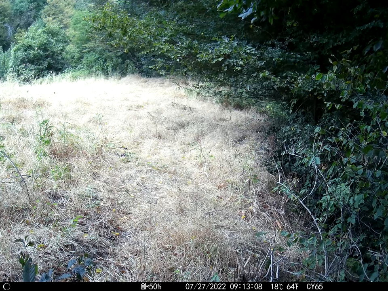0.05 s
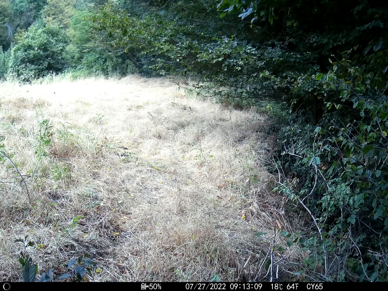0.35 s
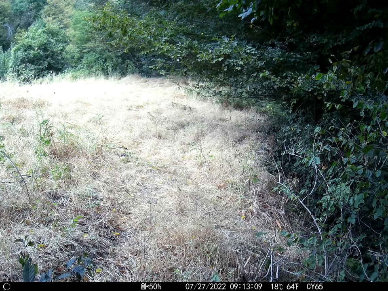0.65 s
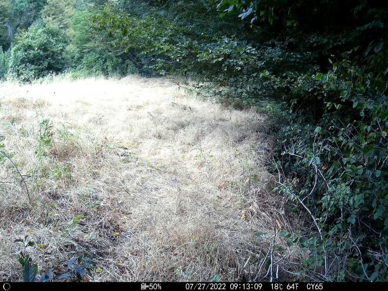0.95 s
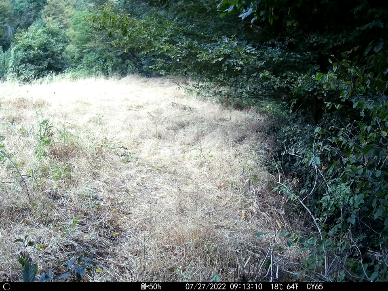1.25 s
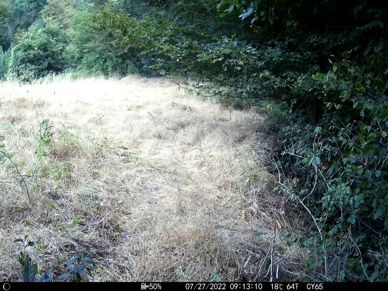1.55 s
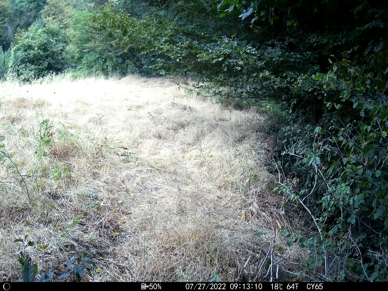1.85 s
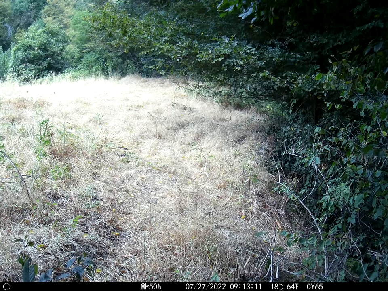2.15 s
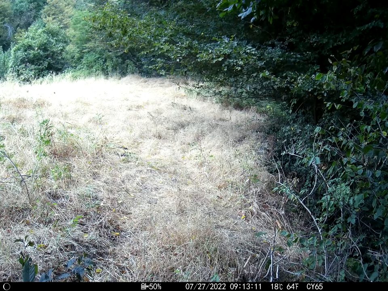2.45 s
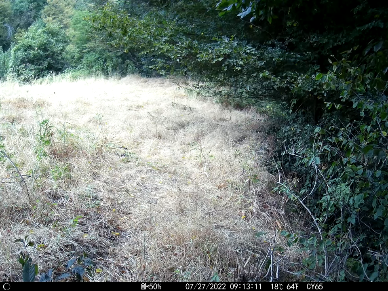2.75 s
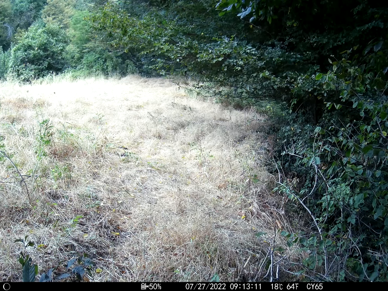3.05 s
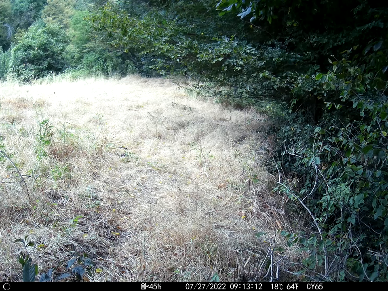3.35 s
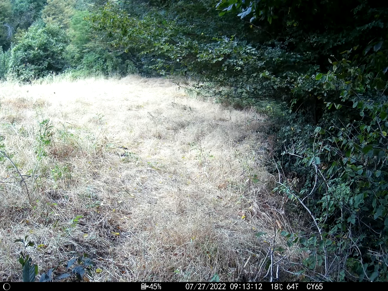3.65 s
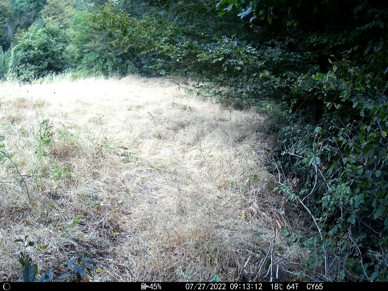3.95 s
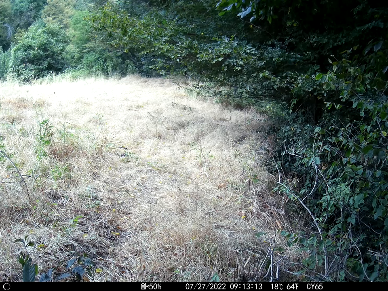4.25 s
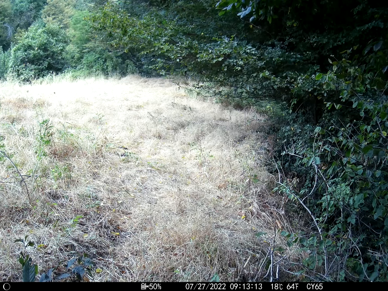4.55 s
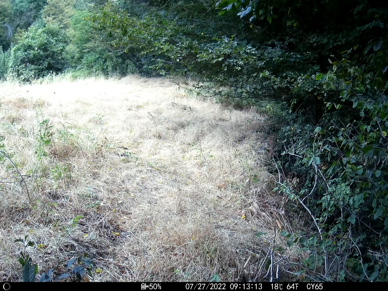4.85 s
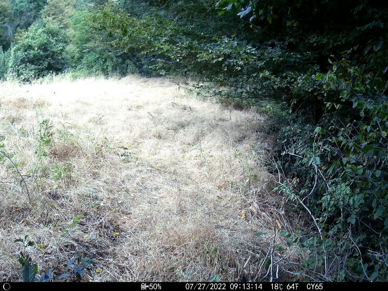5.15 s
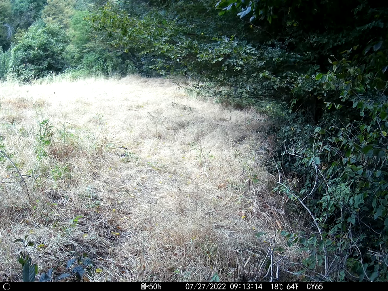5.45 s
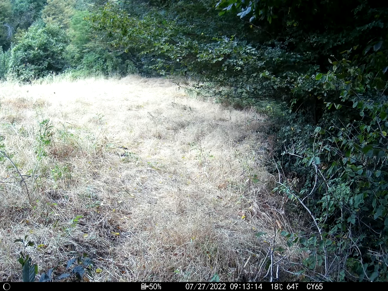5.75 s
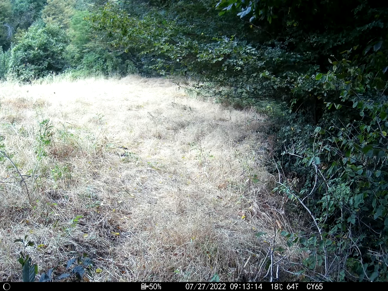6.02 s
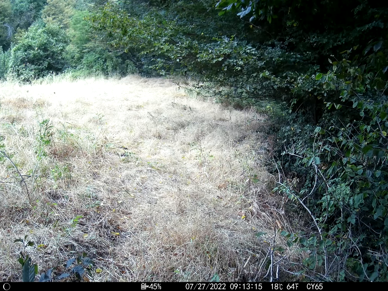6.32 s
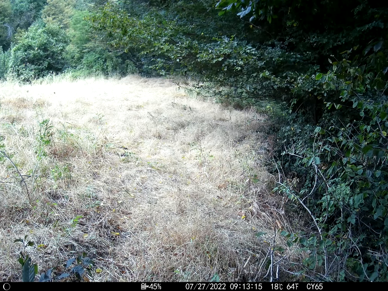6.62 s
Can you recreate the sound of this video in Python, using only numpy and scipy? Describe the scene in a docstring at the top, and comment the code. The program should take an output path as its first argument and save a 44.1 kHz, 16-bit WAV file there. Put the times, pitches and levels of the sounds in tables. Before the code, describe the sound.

At the wooded edge of a meadow, a fox gives four short, harsh barks close to the microphone, separated by pauses of a second or two. Each starts raspy and clears into a cry that drops in pitch, with a brief echo from the bushes and trees. A few faint, far-off bird whistles come before the first bark. A quiet rumble, hiss and thin electronic whine continue throughout.

```python
"""First comes a faint rumble with a trail camera's hiss and thin whine, and a small bird whistling far off.
Then a red fox barks four times across a dry meadow at the edge of a wood.
Its vocal folds shake unevenly and ring through throat and mouth, so each bark starts as a hoarse, rising
rasp before it clears into a falling cry. Bushes and trees scatter the sound back."""
import sys
import numpy as np
from scipy import signal
from scipy.fft import rfft, irfft, next_fast_len
from scipy.io import wavfile
from scipy.ndimage import uniform_filter1d

SR = 44100
rng = np.random.default_rng(int(sys.argv[2]) if len(sys.argv) > 2 else 0)


def transcribe(u):
    """Save the signal u as a 16-bit wav file named by the first command-line argument.

    u: samples, shape (n,) or (channels, n), limited to [-1, 1]; the rate is SR.
    q: integer samples, one column per channel.
    """
    v = np.clip(np.atleast_2d(u).T, -1, 1)
    q = np.round(v * 32767).astype(np.int16)
    wavfile.write(sys.argv[1], SR, q)


N = 298998

# The background's rumble and hiss. Each row: frequency in Hz, relative level in dB.
NOISE_SHAPE = [(12, -42), (20, -0.5), (98, -0.5), (352, -9.5), (382, -10.5), (549, -13.5), (597, -15),
               (667, -15), (1450, -17.5), (2090, -19), (8640, -18), (9660, -17.5), (10500, -18.5),
               (14300, -19.5), (15500, -22)]
# The camera's electronic whine. Each row: multiple of WHINE_HZ, level in dB.
WHINE_TONES = [(3, -84.5), (4, -85.5), (6, -77), (7, -80), (8, -92.5), (9, -90.5)]
# The bird. Each row: start and length in seconds, first and last pitch in Hz, relative level in dB.
WHISTLES = [(0.082, 0.1, 3330, 3470, -66), (.21, 0.052, 3150, 2690, -69.5), (.37, 0.069, 3850, 3610, -75),
            (0.408, 0.059, 2700, 2880, -69), (0.46, 0.11, 2950, 3040, -65.5)]
# How long the wood rings. Each row: frequency in Hz, seconds to fade by 60 dB.
WOOD_RING = [(500, 1), (1100, 1), (1550, 0.78), (2000, 0.48), (4000, 0.3), (10000, .45)]
# Echoes from the nearest trees. Each row: delay in seconds, relative level in dB.
ECHOES = [(0.106, -24.5), (0.176, -29.5), (0.311, -44)]
# Throat and mouth resonances (the frequencies they boost), one list for each bark.
# Each row: frequency in Hz, width in Hz, relative level in dB.
THROAT_RESONANCES = [
    [(650, 270, -30.5), (1068, 256, -4.5), (1370, 95, -2.5), (1651, 240, 1), (2400, 260, -21.5)],
    [(750, 280, -26), (1142, 200, -2), (1400, 204, -4), (1745, 310, -3), (2300, 355, -14.5)],
    [(750, 230, -27), (1068, 240, -1.5), (1396, 370, -10), (1712, 290, 3), (2300, 330, -14)],
    [(605, 270, -16), (1140, 350, -3.5), (1606, 220, -6), (1830, 340, 2), (2320, 400, -19.5)],
]
# High resonances that give a bark its sharp edge. Each row: frequency and width in Hz, relative dB.
EDGE_RESONANCES = [(3060, 600, -4), (3580, 620, 0), (4290, 730, 1.5), (4770, 280, 2), (5242, 340, 3),
                   (5830, 220, -2), (6400, 430, -20), (9000, 6600, -31.5)]
# The resonance that lifts the cry's nearest overtones. Its row: frequency and width in Hz, relative dB.
MOUTH_RESONANCE = [(2300, 320, -23)]
# Tiny yelps. Each row: time of the peak and half-width in seconds, pitch in Hz, level in dB.
YELP_NOTES = [(2.700, 0.0042, 1688, -16.5), (4.702, 0.006, 1660, -17)]
# The barks. Each row: start and length in seconds, relative level in dB; swell time, hold time and time
# until the voice breaks, in seconds; first, top and target pitch in Hz, fall time in seconds;
# roughness of the rasp (0-1), the cry's share of the power (0-1); edge level in dB against the bark,
# edge tilt in dB an octave, share of the edge that the cry's overtones take (0-1).
FOX_BARKS = [(1.287, .39, -22.5, 0.1, 0.12, .16, 515, 807.4, 360, .36, .27, 0.85, -22.5, 8.5, .2),
             (2.561, 0.3, -22.5, 0.069, 0.066, 0.14, 636.6, 769, 568, .16, .26, .72, -14.5, 7, .3),
             (4.528, .395, -18, 0.075, 0.14, 0.17, 599.4, 798.3, 497, .28, .4, 0.87, -7.5, 3.5, .65),
             (5.905, .2, -26, 0.046, 0.068, .06, 525.5, 661.7, 544.7, .08, .48, 0.95, -14, 15, .15)]

NOISE_DB, WHINE_HZ, CUTOFF_HZ = -63.5, 1562.5, 15400
LEAD_IN_S, ONSET_S, CLOSE_S = .04, 0.0055, 0.065   # room before a bark, its rounded start, its closing
CLEAR_S, CRY_ROUGH = 0.066, .33   # how quickly the rasp clears; the cry's roughness (0-1)
EDGE_SWELL_POWER, EDGE_FADE_DB = 1.6, 24   # the edge swells later than the voice
CHEST_DB, CHEST_ATTACK_S, CHEST_FADE_DB = -27, .015, 28.5   # the lowest tone starts fast, fades sooner
PUFF_DB, PUFF_DELAY_S = -40.5, .011   # the soft opening puff, against the bark's level and start
BREAK_JUMP, JUMP_S = .1, .025   # as the voice breaks its pitch jumps up by this share
BREAK_DIP_DB, BREAK_DIP_S = -2.5, 0.0042   # the voice catches as it breaks
SAG_DB, SAG_S, FADE_DB = 8, .035, 6   # after the hold the force sags quickly and fades to the end


def from_db(db):
    """Turn decibels into a number to multiply by."""
    return 10 ** (np.asarray(db) / 20)


def rms_one(x):
    """Scale a sound so its average power is one."""
    return x / np.sqrt(np.mean(x ** 2) + 1e-20)


def evened(x, size=900):
    """Even out slow changes in loudness, leaving the fast flutter."""
    return x / np.sqrt(np.abs(uniform_filter1d(x ** 2, size)) + 1e-12)


def blend(first, second, share):
    """Mix two sounds while keeping the power steady."""
    return evened(np.sqrt(1 - share) * evened(first) + np.sqrt(share) * evened(second))


def ramp(age, begin, span):
    """Go from 0 to 1 in a straight line."""
    return np.clip((age - begin) / max(span, 1 / SR), 0, 1)


def at_hz(points, hz):
    """Read between a table's rows, with octaves evenly spaced."""
    f, value = np.transpose(points)
    return np.interp(np.log(np.maximum(hz, 1)), np.log(f), value)


def wander(rate_hz, size):
    """A smooth random wobble, typically about one in size."""
    low = signal.butter(2, min(rate_hz, SR / 4), fs=SR, output="sos")
    return rms_one(signal.sosfilt(low, rng.standard_normal(2 * size))[size:])


def band_noise(low_hz, high_hz, size):
    """Noise lying mostly between two frequencies."""
    band = signal.butter(2, [low_hz, high_hz], "band", fs=SR, output="sos")
    return signal.sosfilt(band, rng.standard_normal(size))


def background():
    """Steady low rumble and microphone hiss, with the camera's thin whine."""
    colour = from_db(at_hz(NOISE_SHAPE, np.arange(N // 2 + 1) * SR / N))
    noise = from_db(NOISE_DB) * rms_one(irfft(rfft(rng.standard_normal(N)) * colour, N))
    phase = 2 * np.pi * WHINE_HZ * np.arange(N) / SR
    return noise + sum(from_db(db) * np.sqrt(2) * np.sin(round(k) * phase) for k, db in WHINE_TONES)


def meadow(x, near_db=-7.5, near_ring_s=.34, wood_db=-27.0, wood_delay_s=0.059,
           wood_dull_hz=5200, echo_dull_hz=2500):
    """Add quick scatter from bushes, echoes from single trees and a later, duller wash from the wood."""
    t = np.arange(SR) / SR
    near = rng.standard_normal(SR) * from_db(-60 * t / near_ring_s) * (1 - np.exp(-t / 0.006))
    edges, wood = np.geomspace(350, 11200, 11), 0
    for low, high in zip(edges, edges[1:]):
        hz = np.sqrt(low * high)
        decay = from_db(-60 * t / at_hz(WOOD_RING, hz)) * (1 - np.exp(-t / 0.0099))
        dulling = np.hypot(1, (hz / wood_dull_hz) ** 2)
        wood = wood + band_noise(low, high, SR) * decay / np.linalg.norm(decay) / dulling
    wood = np.interp(t - wood_delay_s, t, wood, left=0)
    scatter = from_db(near_db) * near / np.linalg.norm(near) + from_db(wood_db) * wood
    now = np.arange(N) / SR
    echoes = sum(from_db(db) * np.interp(now - delay, now, x, left=0) for delay, db in ECHOES)
    echoes = signal.sosfilt(signal.butter(2, echo_dull_hz, fs=SR, output="sos"), echoes)
    return x + signal.fftconvolve(x, scatter)[:N] + echoes


def bird(waver=0.014):
    """Thin whistles that slide and waver in pitch."""
    out = np.zeros(N)
    for s, length, first_hz, last_hz, db in WHISTLES:
        size, start = int(length * SR), int(s * SR)
        hz = np.linspace(first_hz, last_hz, size) * (1 + waver * wander(130, size))
        tone = np.sqrt(2) * np.sin(2 * np.pi * np.cumsum(hz) / SR)
        out[start:start + size] += from_db(db) * np.hanning(size) * tone
    return out


def envelope(age, length, attack, fade_from, fade_db, power=1):
    """Loudness over time: swell from a rounded start, hold, fade, then close."""
    swell = np.minimum(ONSET_S * np.logaddexp(0, age / ONSET_S) / attack, 1) ** power
    fade = from_db(-fade_db * ramp(age, fade_from, length - fade_from))
    return swell * fade * (1 - ramp(age, length - CLOSE_S, CLOSE_S))


def low_noise(noise_db=-55.5, follow=0.32, puff_s=0.045):
    """Faint low noise swells with each bark; separately, a soft low puff opens each bark."""
    t = np.arange(N) / SR
    loudness = sum(from_db(db) * envelope(t - s, length, attack, attack + hold, SAG_DB + FADE_DB)
                   for s, length, db, attack, hold, *_ in FOX_BARKS)
    noise = from_db(noise_db) * loudness ** follow * rms_one(band_noise(55, 430, N))
    puffs = sum(from_db(db + PUFF_DB) * np.exp(-np.minimum(((t - s - PUFF_DELAY_S) / puff_s) ** 2, 50))
                for s, _, db, *_ in FOX_BARKS)
    return noise + puffs * rms_one(band_noise(160, 250, N))


def yelps():
    """For a few cycles the voice locks onto the upper mouth resonance."""
    t = np.arange(N) / SR
    out = np.zeros(N)
    for peak_s, half_width, hz, db in YELP_NOTES:
        swell = np.exp(-np.minimum(((t - peak_s) / half_width) ** 2, 50))
        out += from_db(db) * np.sqrt(2) * swell * np.sin(2 * np.pi * hz * (t - peak_s))
    return out


def over_ground(x, lag_s=0.002035, bounce=0.14):
    """A bounce off the field arrives upside down and thins the sound about every 500 Hz."""
    t = np.arange(len(x)) / SR
    return x - bounce * np.interp(t - lag_s, t, x, left=0)


def resonate(x, resonances):
    """Let a sound ring through resonances, each passing a narrow range of frequencies."""
    size = next_fast_len(2 * len(x))
    hz = np.arange(size // 2 + 1) * SR / size + 1
    power = sum(from_db(2 * db) / (1 + ((hz * hz - f * f) / (hz * width)) ** 2) ** 2
                for f, width, db in resonances)
    # Build the filter so that it rings only after the sound arrives.
    cepstrum = irfft(np.log(power + 1e-12), size)
    cepstrum[0] /= 2
    cepstrum[size // 2:] = 0
    return irfft(rfft(x, size) * np.exp(rfft(cepstrum)), size)[:len(x)]


def pitch_arch(age, breaks, first_hz, top_hz, end_hz, fall_s, climb_power=2.1, fall_power=1.25):
    """The pitch climbs and levels off, jumps as the voice breaks, then sinks smoothly."""
    rasp_hz = top_hz / (1 + BREAK_JUMP)
    climb = (rasp_hz - first_hz) * (1 - (1 - ramp(age, 0, breaks)) ** climb_power)
    jump = (top_hz - rasp_hz) * ramp(age, breaks - JUMP_S / 2, JUMP_S)
    fall = (top_hz - end_hz) * (1 - np.cos(np.pi * ramp(age, breaks, fall_s) ** fall_power)) / 2
    return first_hz + climb + jump - fall


def fold_phase(pitch, rough, jitter=.03, tremor=0.0091):
    """Follow the vocal folds' cycle, which trembles, and jitters more as the voice roughens."""
    size = len(pitch)
    hz = pitch * (1 + jitter * rough * wander(220, size) + tremor * wander(70, size))
    return 2 * np.pi * np.cumsum(hz) / SR


def chest(phase, rough):
    """The lowest tone and a weaker one at 1.5 times its pitch, shaken by the roughness."""
    shaken = phase + rough * wander(90, len(phase))
    return rms_one(np.sin(shaken) + .5 * np.sin(3 * shaken / 2))


def vocal_folds(phase, rough, between_db=-2.5, rasp=1.5, slope_db=-2.5, waver_db=3.5,
                smear=0.99, pulsing=0.57, count=24):
    """Strong and weak cycles put tones at every half multiple of the pitch; rough air adds noise."""
    size, tones = len(phase), 0
    for k in range(2, count + 1):
        strength_db = slope_db * np.log2(k / 2) + between_db * (k % 2) + waver_db * wander(16, size)
        shake = smear * np.sqrt(rough) * wander(70, size)
        tones = tones + from_db(strength_db) * np.cos(k / 2 * phase + shake)
    rushing_air = rng.standard_normal(size) * (1 + pulsing * np.cos(phase))
    return (1 - rough) * rms_one(tones) + rasp * rough * rushing_air


def cry_overtones(phase, waver_db=4.0, smear=.45, count=9):
    """The higher tones above the cry come and go."""
    size = len(phase)
    return sum(from_db(waver_db * wander(30, size)) * np.sin(k * phase + smear * wander(94, size))
               for k in range(3, count + 1))


def bark(row, throat, flutter_db=3.0, clear_lead_s=.008, edge_lead_s=0.0082):
    """A fluttering rasp through throat and mouth breaks into a cry at twice the folds' pitch."""
    (start, length, level_db, attack, hold, breaks, first_hz, top_hz, end_hz, fall_s,
     rasp_rough, cry_share, edge_db, tilt_db, overtone_share) = row
    age = np.arange(int((LEAD_IN_S + length) * SR)) / SR - LEAD_IN_S
    cleared = ramp(age, breaks - clear_lead_s, CLEAR_S)
    rough = np.clip(rasp_rough + (CRY_ROUGH - rasp_rough) * cleared, 0, 1)
    cry_mix = np.clip(cry_share * cleared, 0, 1)
    phase = fold_phase(pitch_arch(age, breaks, first_hz, top_hz, end_hz, fall_s), rough)
    rasp = over_ground(vocal_folds(phase, rough))
    overtones = cry_overtones(phase)
    cry = np.sin(2 * phase) + resonate(overtones, MOUTH_RESONANCE)

    body = blend(resonate(rasp, throat), cry, cry_mix)
    catch_db = BREAK_DIP_DB * np.exp(-((age - breaks) / BREAK_DIP_S) ** 2)
    sag_db = SAG_DB * ramp(age, attack + hold, SAG_S)
    body *= from_db(flutter_db * rough * wander(120, len(age)) + catch_db - sag_db)
    body *= envelope(age, length, attack, attack + hold, FADE_DB)

    tilted = [(hz, width, db + tilt_db * np.log2(min(hz, 6500) / 4500))
              for hz, width, db in EDGE_RESONANCES]
    edge = blend(resonate(rasp, tilted), resonate(overtones, tilted), overtone_share * cry_mix)
    edge *= envelope(age, length, attack, breaks - edge_lead_s, EDGE_FADE_DB, EDGE_SWELL_POWER)

    low = chest(phase, rough) * envelope(age, length, CHEST_ATTACK_S, breaks, CHEST_FADE_DB)
    voice = body + from_db(edge_db) * edge + from_db(CHEST_DB) * low
    return np.pad(from_db(level_db) * voice, (int((start - LEAD_IN_S) * SR), N))[:N]


def fox(voice_db=-1.83, low_cut_hz=505):
    """All barks and yelps; the small muzzle sends out little below the lowest pitch."""
    barks = sum(bark(row, throat) for row, throat in zip(FOX_BARKS, THROAT_RESONANCES))
    muzzle = signal.butter(8, low_cut_hz, "high", fs=SR, output="sos")
    return signal.sosfilt(muzzle, from_db(voice_db) * barks + yelps())


def scene():
    """The fox is near; the bird is deep in the trees, so more of its sound is scattered."""
    far_bird = from_db(-1.5) * meadow(bird(), near_db=-1.0, wood_db=-12.0)
    return (meadow(fox() + low_noise()) + far_bird + background())[None]


def record(dry):
    """The camera cuts off the highest treble steeply."""
    return signal.sosfilt(signal.ellip(10, .1, 80, CUTOFF_HZ, fs=SR, output="sos"), dry)


dry = scene()
out = record(dry)
transcribe(out)
```